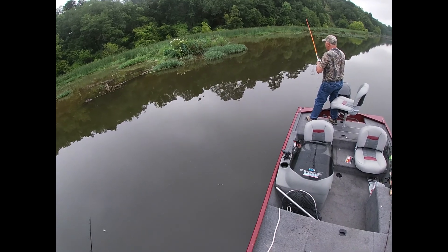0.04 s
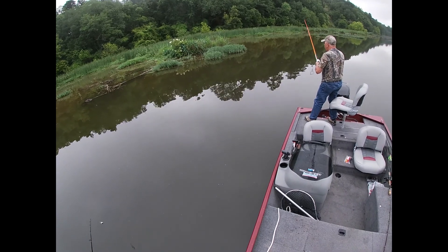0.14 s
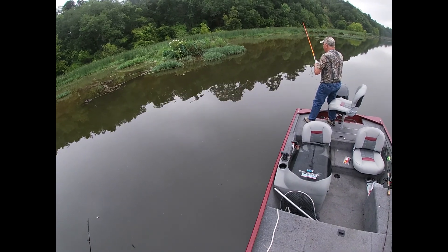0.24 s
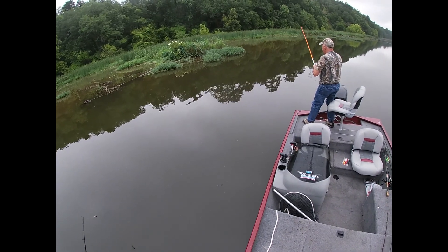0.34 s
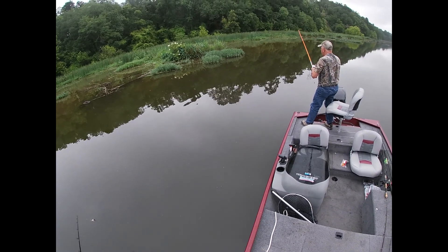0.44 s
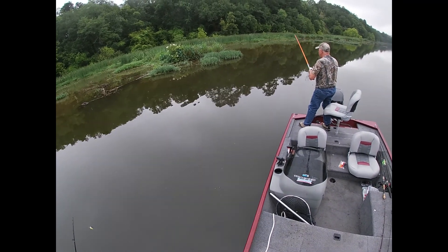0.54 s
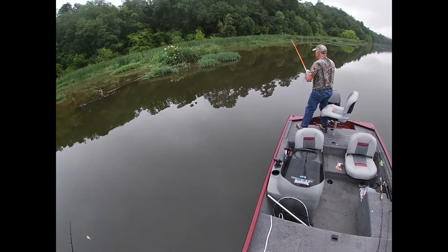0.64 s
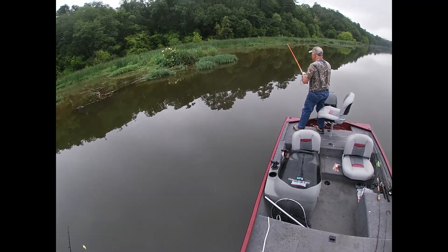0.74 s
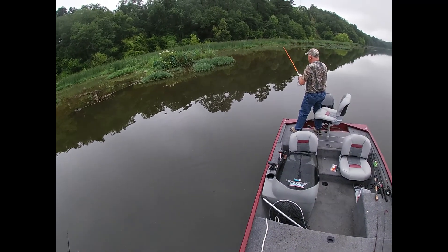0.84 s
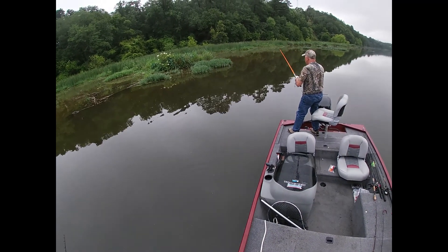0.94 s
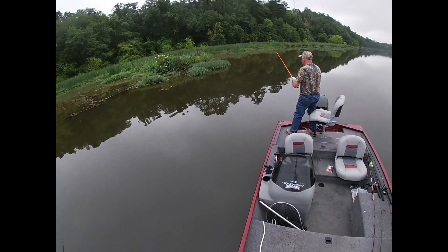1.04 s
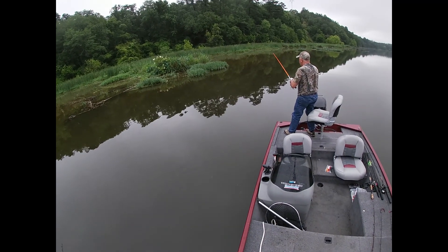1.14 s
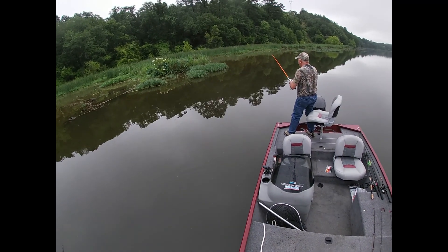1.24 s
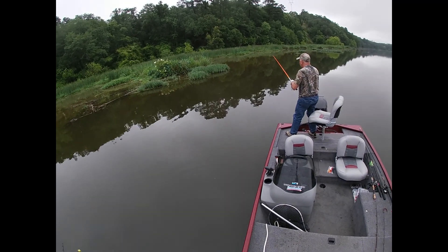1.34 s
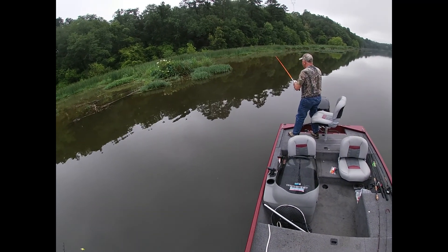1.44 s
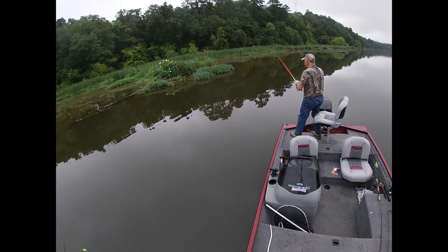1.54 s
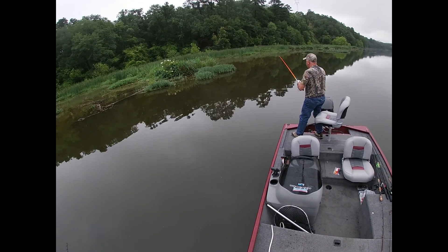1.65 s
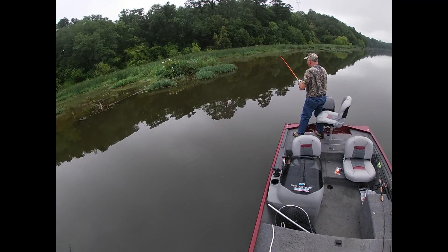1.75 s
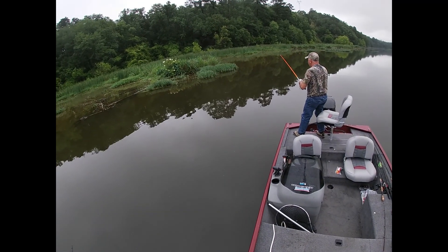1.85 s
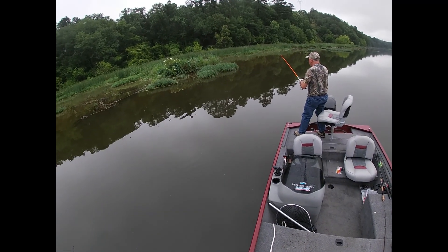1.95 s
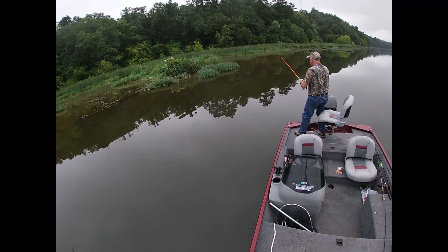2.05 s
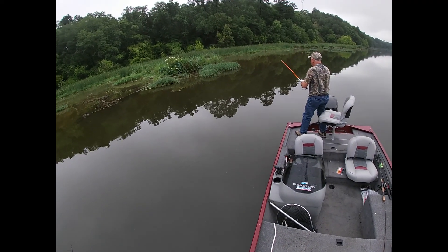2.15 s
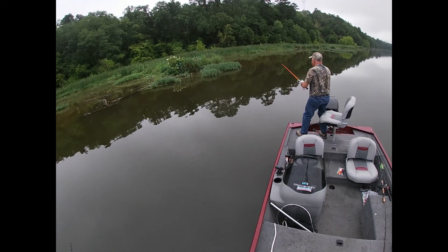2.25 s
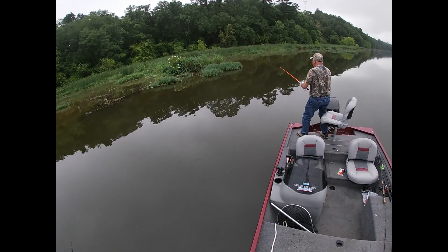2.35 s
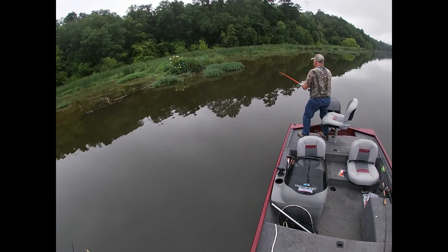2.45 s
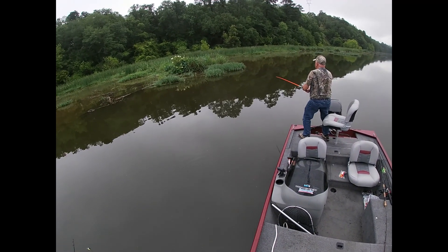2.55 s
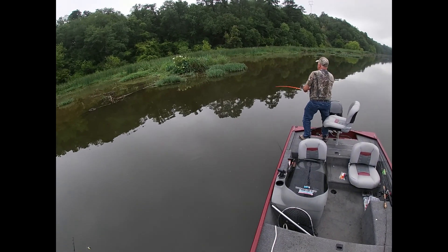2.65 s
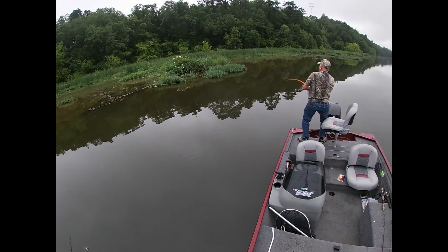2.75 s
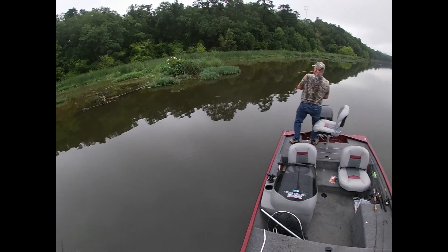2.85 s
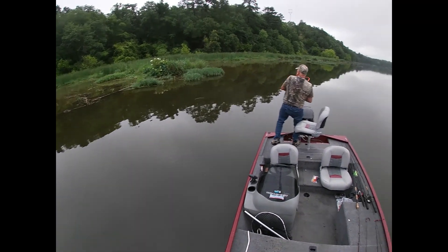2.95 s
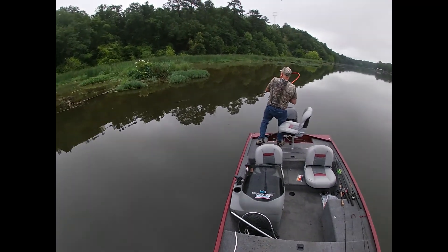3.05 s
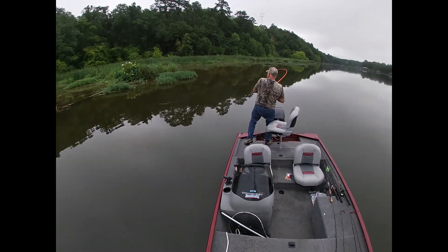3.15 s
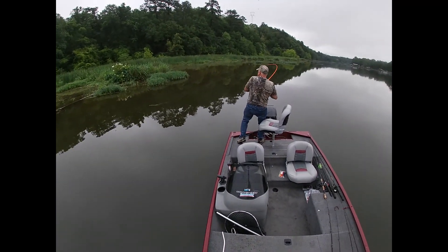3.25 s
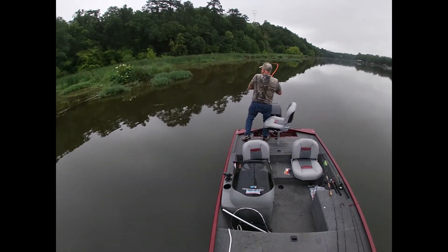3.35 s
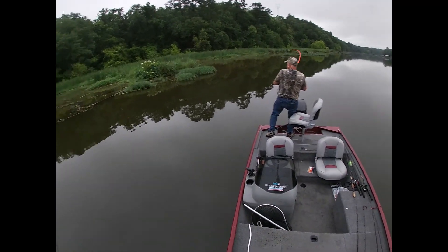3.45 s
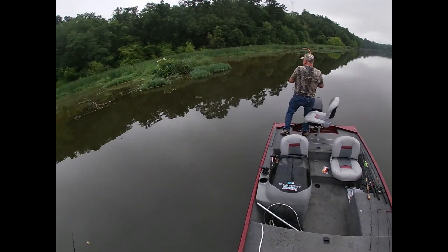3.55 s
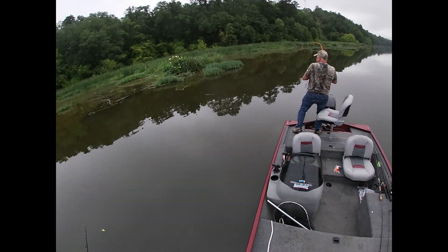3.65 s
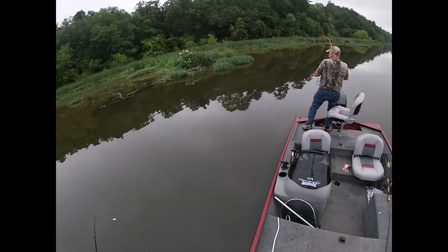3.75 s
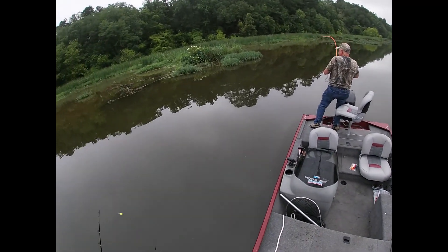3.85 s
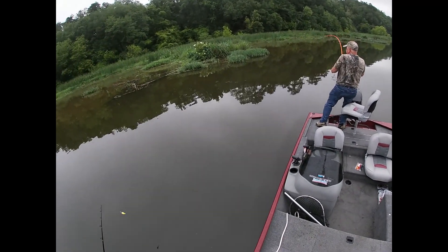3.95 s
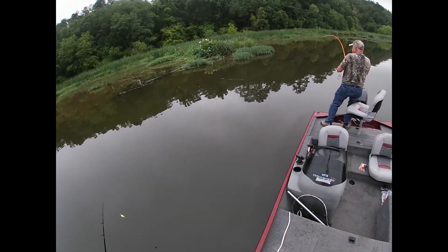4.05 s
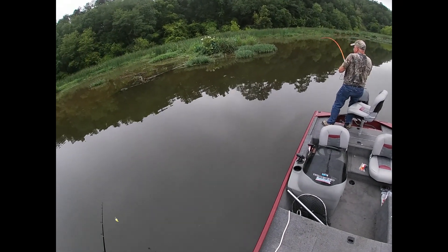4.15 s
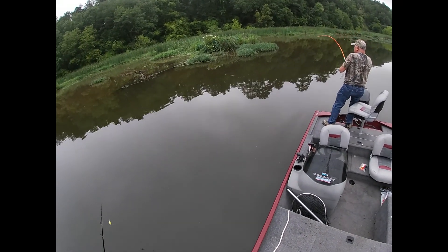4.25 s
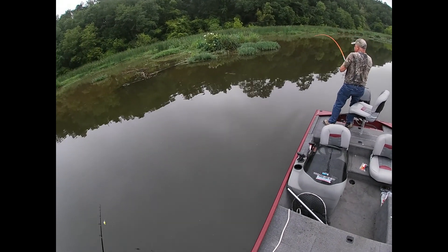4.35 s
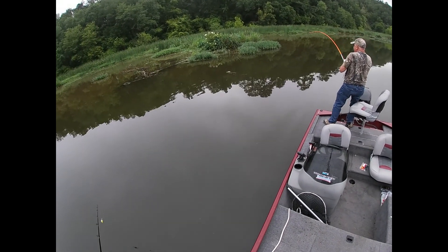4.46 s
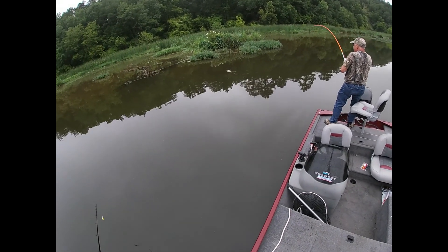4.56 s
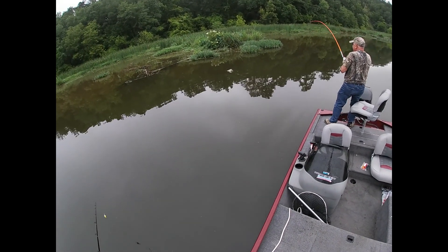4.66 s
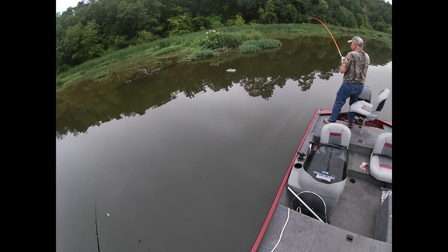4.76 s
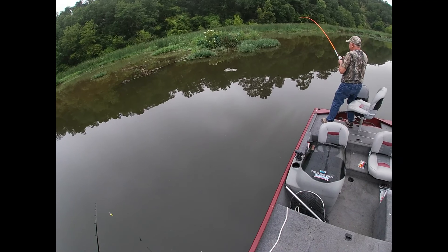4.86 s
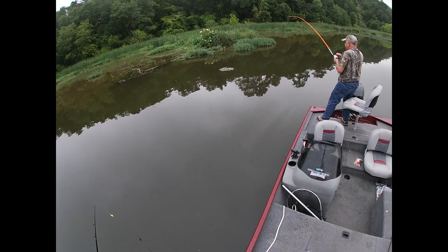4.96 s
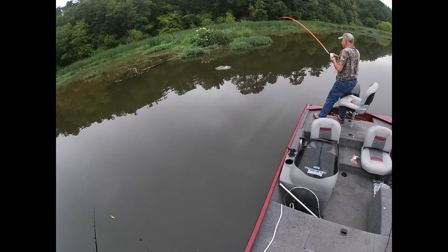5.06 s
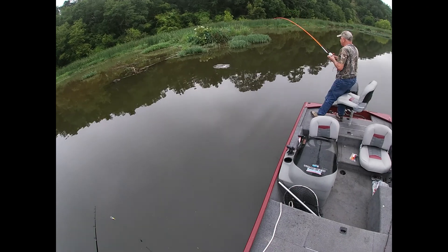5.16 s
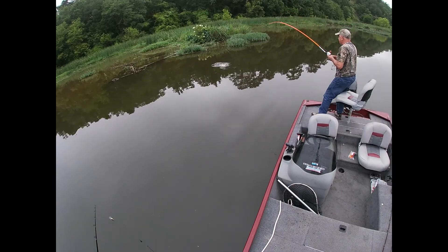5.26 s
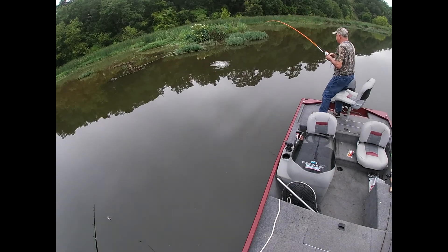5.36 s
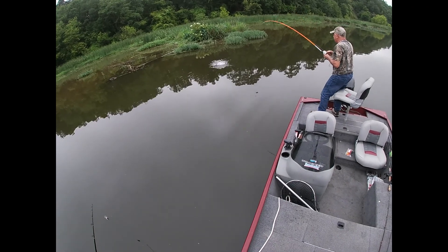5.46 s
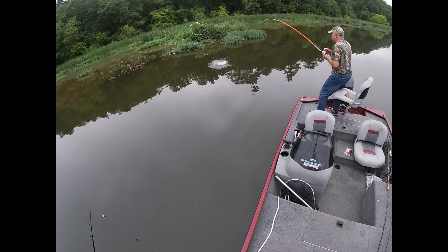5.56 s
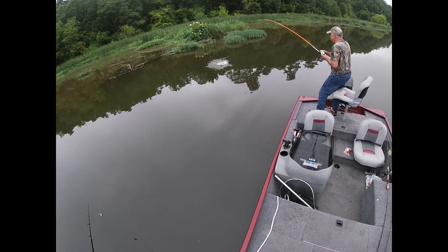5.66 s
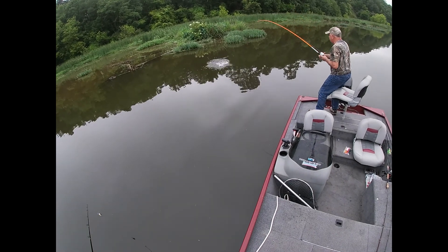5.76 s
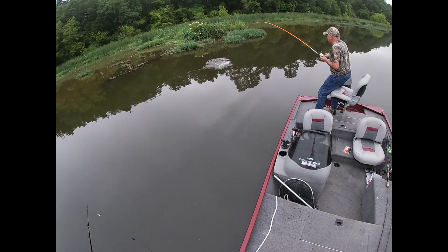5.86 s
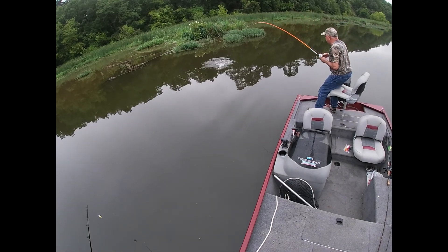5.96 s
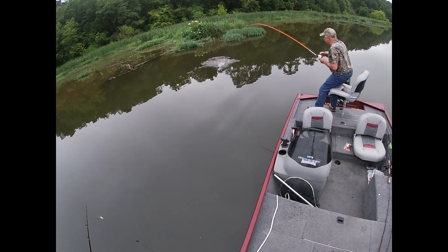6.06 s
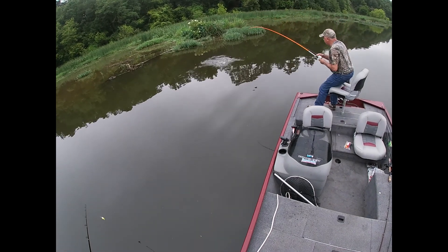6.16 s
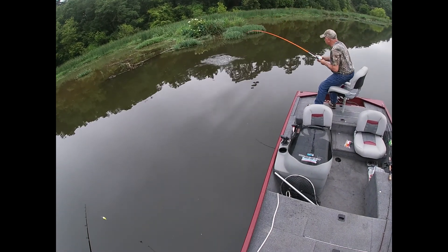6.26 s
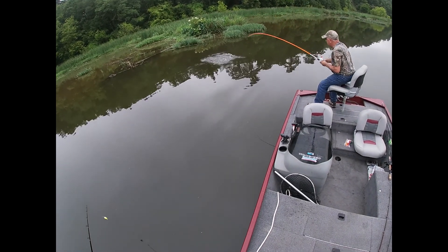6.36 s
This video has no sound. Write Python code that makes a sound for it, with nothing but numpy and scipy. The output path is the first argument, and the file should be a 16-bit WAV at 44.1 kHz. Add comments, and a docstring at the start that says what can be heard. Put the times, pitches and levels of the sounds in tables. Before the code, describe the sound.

Quiet lakeside with steady insect buzz and birdsong, a faint reel whirr, sharp hollow boat knocks, then a hooked fish slapping and churning the water.

```python
"""A calm lake under a wooded bank: insects buzz as pulsed narrow-band noise and songbirds whistle gliding tones.
An electric motor throbs as a faint low hum under still air, a faint drone and wind, and a reel whirrs in spells.
One bird then repeats a three-note motif, and the boat's deck knocks twice as the hook is set, its modes ringing.
Last, the hooked bass thrashes a few boat lengths away: churned water rings as swarms of damped bubble tones,
the body slaps in noise bursts, trapped air pockets gulp in rising tones, and spray patters back."""
import sys
import numpy as np
from scipy import signal
from scipy.fft import rfft, irfft, next_fast_len
from scipy.io import wavfile
from scipy.ndimage import map_coordinates

SR = 44100
rng = np.random.default_rng(int(sys.argv[2]) if len(sys.argv) > 2 else 0)


def store_pcm(level_fs):
    """Save levels as 16-bit WAV."""
    pcm = np.round(np.clip(level_fs, -1, 1) * 32767).astype(np.int16)
    wavfile.write(sys.argv[1], SR, np.atleast_2d(pcm).T)


N = 283122  # length in samples


def amp(db):
    """Level: every 20 dB is a tenfold amplitude."""
    return 10 ** (np.asarray(db) / 20)


def unit(x):
    """Normalisation: scale to rms 1."""
    return x / np.sqrt(np.mean(x ** 2) + 1e-20)


def clock(length):
    """Sampling: the sample times over a length in seconds."""
    return np.arange(int(length * SR)) / SR


def wobble(rate):
    """Slow random modulation: a smooth curve through normal random knots, rate knots a second."""
    knots = rng.standard_normal(int(N * rate / SR) + 4)
    return map_coordinates(knots, [np.arange(N) * rate / SR])


def filtered(x, response):
    """Linear filtering: multiply the spectrum by a response of frequency in Hz."""
    size = next_fast_len(len(x) + 8192)  # zero padding
    return irfft(rfft(x, size) * response(np.fft.rfftfreq(size, 1 / SR)), size)[:len(x)]


def coloured(x, points):
    """Spectral shaping: filter x through (Hz, dB) points joined on a log frequency axis, at rms 1."""
    f, db = np.transpose(points)
    return unit(filtered(x, lambda hz: amp(np.interp(np.log(hz + 1), np.log(f), db))))


def noise(points):
    """Coloured noise: white noise shaped by (Hz, dB) points, at rms 1."""
    return coloured(rng.standard_normal(N), points)


def resonance(hz, width):
    """Narrow-band resonance: noise of rms 1 under one peak, width in Hz."""
    return unit(filtered(rng.standard_normal(N), lambda f: 1 / (1 + (2 * (f - hz) / width) ** 2)))


def tone(pitch):
    """Frequency modulation: the phase is the running sum of the pitch in Hz."""
    return np.sin(2 * np.pi * np.cumsum(pitch) / SR)


def fade(t, t60, attack):
    """Damped decay: a quick rise, then an exponential loss of 60 dB per t60 seconds."""
    return np.exp(-np.log(1000) * t / t60) * (1 - np.exp(-t / attack))


def swells(rows, attack_s, fall_db_per_s, rest_db):
    """Power summation: (start s, length s, dB) rows rise, hold and fall away over a resting level."""
    t = np.arange(N) / SR
    power = amp(rest_db) ** 2
    for start, length, db in rows:
        rise = 1 - np.exp(-np.maximum(t - start, 0) / attack_s)
        fall_db = fall_db_per_s * np.maximum(t - start - length, 0)
        power = power + (rise * amp(db - fall_db)) ** 2
    return np.sqrt(power)


def add(track, start, sound):
    """Superposition: mix a sound into a track at a start in seconds."""
    part = track[max(round(start * SR), 0):][:len(sound)]
    part += sound[:len(part)]


def bubbles(rate, low_hz, high_hz, cycles, rise, spread_db):
    """Bubble resonance: a steady swarm, rate a second, of softly starting, damped tones that rise in pitch."""
    pitch_draw, decay_draw, level_draw, time_draw = rng.random((4, int(rate * N / SR), 1))
    hz = low_hz * (high_hz / low_hz) ** pitch_draw
    t = clock(min(.045, cycles / low_hz))[None]
    age = t * hz / (cycles * (.5 + decay_draw))  # 1 once the tone has lost 60 dB
    size = amp(spread_db * np.minimum(-np.log(1 - level_draw), 3)) * np.sqrt(hz)
    envelope = size * np.minimum(2 * t * hz, 1) * np.exp(-np.log(1000) * age)
    # the pitch has gained the share "rise" at age 1
    tones = envelope * np.sin(2 * np.pi * hz * t * (1 + rise * np.minimum(age, 2) / 2))
    at = (time_draw * N).astype(int) + np.arange(t.size)
    return np.bincount(at.ravel(), tones.ravel(), N)[:N]


def thrash():
    """Bubble resonance: churned water rings, gurgles and plops while spray patters and ticks over a fizz."""
    # Bouts of thrashing. Each row: start in seconds, length in seconds, churn, spray and gurgle levels in dB.
    bouts = [(4.735, 0.079, -58, -60, -85), (4.867, 0.092, -57.5, -54.5, -77),
             (5.08, 0.24, -57.5, -58.5, -71), (5.28, 0.23, -53.5, -55, -58), (5.5, 0.32, -50.5, -52, -61),
             (5.776, 0.29, -51, -54, -62), (6.075, 0.037, -68, -66, -52.5)]
    # Spectra of churned water and of spray. Each row: frequency in Hz, relative level in dB.
    churn_spectrum = [(100, -39), (170, 12.5), (260, -11), (450, -9.5), (770, -1.5), (1060, -7), (1500, 3),
                      (2000, -7), (2300, -4.5), (3200, -12), (5000, -12), (8000, -68)]
    spray_spectrum = [(900, -30), (1800, -3.5), (3100, 3.5), (4300, -2), (6200, -0.5), (7500, -8.5),
                      (8700, -20.5), (10000, -20.5), (12500, -37), (15500, -55)]
    starts, lengths, churn_db, spray_db, gurgle_db = np.transpose(bouts)
    churn_gain = swells(zip(starts, lengths, churn_db), attack_s=0.02, fall_db_per_s=44.0, rest_db=-110)
    spray_gain = swells(zip(starts, lengths, spray_db), attack_s=0.015, fall_db_per_s=34.0, rest_db=-110)
    gurgle_gain = swells(zip(starts, lengths, gurgle_db), attack_s=0.022, fall_db_per_s=94, rest_db=-110)

    churn = bubbles(rate=380, low_hz=497.6, high_hz=3500, cycles=37.0, rise=0.34, spread_db=1.5)
    plops = bubbles(rate=60, low_hz=696, high_hz=2017, cycles=49, rise=0.18, spread_db=2.0)
    gurgle = bubbles(rate=160, low_hz=177, high_hz=526, cycles=11.4, rise=0.49, spread_db=2.5)
    drops = bubbles(rate=1100, low_hz=1810, high_hz=12700, cycles=26.4, rise=0.16, spread_db=2)
    # single drops landing
    ticks = unit(bubbles(rate=77, low_hz=2180, high_hz=6540, cycles=4.9, rise=.1, spread_db=-3.0))
    ticks = filtered(ticks, lambda hz: 1 / np.hypot(1, (hz / 7000) ** 4))

    water = coloured(churn, churn_spectrum) + amp(-6.0) * unit(plops)
    spray = coloured(drops, spray_spectrum) + amp(-12) * ticks
    fizz = amp(-13) * (churn_gain * noise(churn_spectrum) + spray_gain * noise(spray_spectrum))
    clumps = amp(1.6 * wobble(45))  # water falls back in sheets
    return clumps * (churn_gain * water + gurgle_gain * unit(gurgle) + spray_gain * spray + fizz)


def slaps():
    """Impact radiation: each blow gives a pressure pulse and a noise burst; flatter landings are brighter."""
    # Blows of tail and body on the water. Each row: start in seconds, level in dB, upper band limit in Hz.
    blows = [(4.876, -50.5, 1800), (5.010, -50.5, 2600), (5.079, -42.5, 1544), (5.091, -44.5, 2050),
             (5.168, -44.5, 2000), (5.327, -49, 4280), (5.379, -42.5, 1390), (5.395, -38, 1100),
             (5.466, -43, 1100), (5.512, -37.5, 3240), (5.525, -38.5, 3420), (5.687, -44, 3500),
             (5.806, -41.5, 3430), (6.044, -46.5, 1274), (6.060, -41, 3500), (6.090, -42, 2970),
             (6.110, -41.5, 1250), (6.127, -46, 3820), (6.334, -47, 1800)]
    out, t = np.zeros(N), clock(0.22)

    def spectrum(hz, top_hz):
        """Band-pass: a low cut, a slight tilt and a steep roll-off above top_hz."""
        tilt = 1 / np.hypot(1, hz / 1100) ** 0.075
        return hz / np.hypot(hz, 280) * tilt / np.hypot(1, (hz / top_hz) ** 4)

    for start, db, top_hz in blows:
        burst = unit(filtered(rng.standard_normal(len(t)), lambda hz: spectrum(hz, top_hz)))
        burst = burst * fade(t, t60=137 / top_hz, attack=0.00033)  # dull blows last longer
        push = np.sin(np.pi * top_hz * t) * fade(t, t60=7 / top_hz, attack=.0001)
        add(out, start, amp(db) * (burst + amp(-13.0) * push))
    return filtered(out, lambda hz: 1 / np.hypot(1, (hz / 7000) ** 4))


def pockets():
    """Bubble resonance: trapped air rings, rising in pitch as it nears the surface; big pockets climb more."""
    # Singly ringing air pockets. Each row: start in seconds, starting pitch in Hz, level in dB, t60 in seconds.
    air_pockets = [(4.751, 692, -46, 0.071), (4.790, 1250, -44.5, 0.052), (4.840, 1700, -36, 0.04),
                   (4.884, 420, -47.5, 0.16), (4.976, 191, -40, 0.093), (5.035, 840, -42, 0.033),
                   (5.079, 333, -28.5, 0.019), (5.093, 200, -49, 0.13), (5.168, 784, -30.5, 0.03),
                   (5.195, 820, -33.5, 0.044), (5.303, 1256, -40, 0.037), (5.394, 870, -32, .025),
                   (5.421, 305, -44, 0.23), (5.467, 388, -37, 0.1), (5.487, 240, -36, 0.051),
                   (5.511, 564, -19, 0.01), (5.516, 279, -34, 0.18), (5.591, 1400, -40, 0.03),
                   (5.612, 677, -37, 0.038), (5.665, 691, -42, 0.091), (5.692, 1554, -45, 0.044),
                   (5.945, 745, -37, .07), (5.956, 2360, -39, 0.023), (6.01, 1360, -36.5, 0.032),
                   (6.032, 184, -31.5, 0.15), (6.046, 275, -31, 0.071), (6.090, 2310, -37, 0.035),
                   (6.100, 216, -34.5, 0.078), (6.103, 813, -34, 0.031), (6.115, 326, -38.5, 0.12),
                   (6.190, 700, -35, 0.024), (6.235, 430, -39, 0.083), (6.331, 196, -37.5, 0.1),
                   (6.334, 595, -31, 0.019), (6.355, 670, -38, 0.05)]
    octave_rise_hz = 237  # a pocket of this pitch climbs an octave within its t60
    swell_cycles = 0.93  # big pockets start more softly than small ones
    out, t = np.zeros(N), clock(.25)
    for start, hz, db, t60 in air_pockets:
        octaves = octave_rise_hz / hz * np.minimum(t / t60, 1)
        add(out, start, amp(db) * tone(hz * 2 ** octaves) * fade(t, t60, attack=swell_cycles / hz))
    return out


def scattered(x):
    """Diffuse scattering: ripples and the near bank return a sound as a short wash."""
    t = clock(.25)
    tail = rng.standard_normal(len(t)) * fade(t, t60=0.23, attack=0.0097)
    return x + amp(-11.5) * signal.fftconvolve(x, tail / np.linalg.norm(tail))[:N]


def knocks():
    """Modal vibration: a hard double contact cracks, the struck part rings, the hollow deck booms and rattles."""
    # Knocks on the boat. Each row: start in seconds, crack level in dB, deck level in dB,
    # ring of the struck part in Hz, ring level in dB.
    contacts = [(2.801, -38.5, -48.5, 1790, -39.5), (2.999, -55, -51, 470, -46.5),
                (3.0188, -33, -43, 2140, -37.5)]
    # Spectrum of the crack. Each row: frequency in Hz, relative level in dB.
    crack_spectrum = [(300, -14), (1000, -8.5), (1900, -2), (3800, 0), (5500, 5), (7500, -10), (10000, -22),
                      (15000, -45)]
    # Modes of the deck. Each row: frequency in Hz, mean relative level in dB, t60 in seconds.
    deck_modes = [(167.3, 0, 0.49), (198, 1, 0.37), (240, -3.5, 0.21), (381, -3, 0.17), (409, -4, 0.16),
                  (504, -2.5, 0.18), (638, 1, 0.078), (734, -3.5, .13), (940, -7, 0.064), (1310, -5, 0.1),
                  (1526, -2, 0.08)]
    rattle_spectrum = [(100, 6.5), (350, 5.5), (1400, -1), (3500, -1.5), (7000, -9), (14000, -63)]  # Hz, dB
    out, t = np.zeros(N), clock(0.44)
    for start, crack_db, deck_db, ring_hz, ring_db in contacts:
        for delay, db in [(0, 1.9), (.003, 0.21)]:  # seconds, dB
            crack = noise(crack_spectrum)[:len(t)] * fade(t, t60=0.023, attack=0.000087)
            add(out, start + delay, amp(crack_db + db) * crack)
        ring = np.sin(2 * np.pi * ring_hz * t) * fade(t, t60=0.037, attack=0.00046)
        add(out, start, amp(ring_db) * ring)
        boom = np.zeros(len(t))
        for hz, db, t60 in deck_modes:
            mode = np.sin(2 * np.pi * (hz * t + rng.random())) * fade(t, t60, attack=0.0011)
            boom += amp(db + rng.normal(0, 2.1)) * mode  # every knock excites the modes unevenly
        rattle = (noise(rattle_spectrum) * amp(3.3 * wobble(152)))[:len(t)]
        rattle = rattle * fade(t, t60=0.24, attack=0.0028)
        add(out, start, amp(deck_db) * (amp(-6.5) * boom + amp(-2.0) * rattle))
    return out


def hump(u):
    """Amplitude envelope: a note swells and fades over its relative time u, 0 to 1."""
    return np.sqrt(np.abs(np.sin(np.pi * u)))


def whistle(length, start_hz, final_hz, sag=0):
    """Frequency glide: a slightly quavering note; a positive sag bends its pitch below the straight line."""
    u = clock(length) / length
    pitch = (start_hz + (final_hz - start_hz) * u) * (1 - sag * np.sin(np.pi * u))
    quaver = 1 + 0.0035 * np.sin(2 * np.pi * (2 * u + rng.random()))
    return tone(pitch * quaver) * hump(u)


def arch(length, top_hz):
    """Frequency glide: a note hooks up to its pitch, holds it unsteadily and drops off at the end."""
    u = clock(length) / length
    hook = (np.abs(u - .45) / .55) ** 4
    drop = 0.142  # share of the pitch lost at the end
    return tone(top_hz * (1 - drop * hook + 0.002 * wobble(90)[:len(u)])) * hump(u)


def thin_call(length, hz):
    """Random frequency modulation: a very high, sinking note flutters fast and unevenly."""
    u = clock(length) / length
    fall, flutter = 0.031, 0.022  # shares of the pitch
    return tone(hz * (1 - fall * u + flutter * wobble(220)[:len(u)])) * hump(u)


def far_birds():
    """Superposition: farther birds twitter in many hooked notes, up and down at random."""
    # The spell of twittering. Each row: start in seconds, length in seconds, level in dB.
    twitter = [(2.2, 1.63, -71.5)]
    far = np.zeros(N)
    for when, start, final, bend in rng.random(size=(150, 4)):
        note = whistle(.045, 2700 + 1900 * start, 2700 + 1900 * final, sag=.25 * (bend - .5))
        add(far, when * N / SR, note)
    return swells(twitter, attack_s=0.12, fall_db_per_s=8, rest_db=-84) * unit(far)


def birds():
    """Reverberation: songbirds on the bank, one repeating its motif, are smeared by echoes among the trunks."""
    # Falling slurs. Each row: start in seconds, starting pitch in Hz, level in dB.
    slurs = [(.03, 3230, -59.5), (.315, 3400, -60.5), (2.082, 4344, -61.5), (2.129, 5200, -62),
             (2.36, 4600, -61), (2.72, 4870, -59.5), (3.895, 4600, -62), (4.336, 4270, -55),
             (4.437, 3980, -63)]
    # Sliding whistles and upward flicks. Each row: start and length in seconds, starting and final pitch in Hz,
    # level in dB.
    slides = [(0.159, 0.15, 2750, 2470, -71), (1.008, 0.19, 2830, 2580, -65),
              (1.901, 0.19, 2890, 2650, -65), (2.1, 0.24, 2624, 2395, -71.5),
              (2.239, .036, 4400, 4860, -56.5), (2.337, .03, 3480, 4550, -56),
              (4.285, 0.021, 3060, 4420, -56)]
    # Arched whistles. Each row: start and length in seconds, top pitch in Hz, level in dB.
    arches = [(0.613, .085, 3780, -67.5), (0.782, 0.13, 3370, -64), (.985, 0.076, 3810, -66),
              (1.151, 0.11, 3320, -60.5), (1.371, 0.062, 3785, -69), (1.53, 0.075, 3300, -64)]
    # Very high, fluttering calls. Each row: start and length in seconds, starting pitch in Hz, level in dB.
    thin_calls = [(0.133, .05, 7300, -75), (3.97, 0.16, 7650, -73), (4.05, 0.23, 7000, -72),
                  (4.33, 0.12, 6700, -65.5), (4.747, 0.088, 6720, -62), (4.78, 0.13, 8100, -70)]
    # Three-note motif. Each row: delay into the motif and length in seconds, starting and final pitch in Hz,
    # sag as a share of the pitch, level in dB.
    motif = [(0, .059, 4256, 2765, 0.06, -59.5), (0.073, 0.055, 3080, 3570, -0.056, -74),
             (0.169, 0.026, 2068, 2010, 0, -60)]
    song = np.zeros(N)
    for start, start_hz, db in slurs:
        add(song, start, amp(db) * whistle(0.046, start_hz, .72 * start_hz, sag=0.0476))
    for start, length, start_hz, final_hz, db in slides:
        add(song, start, amp(db) * whistle(length, start_hz, final_hz))
    for start, length, top_hz, db in arches:
        add(song, start, amp(db) * arch(length, top_hz))
    for start, length, hz, db in thin_calls:
        add(song, start, amp(db) * thin_call(length, hz))
    for start in 2.607 + .304 * np.arange(6):  # six evenly spaced motifs, in seconds
        for delay, length, start_hz, final_hz, sag, db in motif:
            add(song, start + delay, amp(db) * whistle(length, start_hz, final_hz, sag))
    song = song * amp(2.3 * wobble(70)) + far_birds()
    t = clock(.6)
    woods = rng.standard_normal(len(t)) * fade(t, t60=0.56, attack=0.0015)
    echoes = signal.fftconvolve(song, woods / np.linalg.norm(woods))[:N]
    return amp(-0.5) * song + amp(-4.0) * echoes


def insects():
    """Amplitude modulation: a chorus blurs into a narrow buzz, with the nearest singer's pulses in it."""
    # Spectrum of the chorus. Each row: frequency in Hz, relative level in dB.
    chorus_spectrum = [(3500, -32), (4600, -20), (4950, -6.5), (5250, 3), (5650, -5), (6050, -4.5),
                       (6400, -11.5), (6900, -31.5), (8000, -43.5), (14000, -77)]
    pulses = tone(70 + 0.7 * wobble(2.8))  # pulses a second
    return amp(-55.0 + 0.63 * pulses + 0.52 * wobble(8.4)) * noise(chorus_spectrum)


def reel():
    """Broadband friction noise: the reel whirrs softly in spells of winding line."""
    # Spells of winding. Each row: start in seconds, length in seconds, level in dB.
    winding = [(.64, 0.61, -65.5), (1.8, 0.083, -67.5), (2.62, 0.21, -64), (2.94, 0.11, -58),
               (3.1, 0.44, -69.5)]
    # Spectrum of the whirr. Each row: frequency in Hz, relative level in dB.
    whirr_spectrum = [(300, -0.5), (800, 2.5), (1100, -0.5), (1500, 8), (2000, -5.5), (2800, 3),
                      (4500, -18), (7500, -12.5), (11000, -34), (15000, -61)]
    gain = swells(winding, attack_s=0.031, fall_db_per_s=110, rest_db=-79.5)
    return gain * noise(whirr_spectrum)


def motor():
    """Amplitude modulation: the electric motor's unsteady low hum throbs at a drifting rate."""
    # Course of the hum. Each row: time in seconds, throbs a second, level in dB about which it throbs.
    motor_course = [(0, 5, -73.5), (1.1, 6.5, -78.5), (2.2, 4.43, -73.5), (3.4, 2.94, -71.5),
                    (3.9, 2.8, -64.5), (4.5, 2.67, -80), (4.95, 1.8, -64.5), (5.3, 2.9, -78),
                    (5.8, 3.6, -71.5)]
    t = np.arange(N) / SR
    times, throb_rate, db = np.transpose(motor_course)
    throbs = np.cumsum(np.interp(t, times, throb_rate)) / SR
    throb = np.cos(2 * np.pi * (throbs - np.interp(0.231, t, throbs)))  # a crest at 0.231 s
    return amp(np.interp(t, times, db) + 7 * throb) * tone(77.6 + 3 * wobble(12))


def wind():
    """Turbulence: light wind rumbles as low-frequency noise and swells in short puffs."""
    # Puffs of wind. Each row: start in seconds, length in seconds, level in dB.
    puffs = [(3.42, 0.096, -59.5), (6.19, 0.051, -56)]
    rumble = noise([(8, -7.5), (25, -10.5), (60, -7.5), (130, -25.0), (500, -74)])  # Hz, dB
    gain = swells(puffs, attack_s=0.012, fall_db_per_s=172, rest_db=-77.0)
    return gain * amp(2.1 * wobble(5.3)) * rumble


def drone():
    """Narrow-band resonance: faint bands of the surroundings waver independently."""
    # Bands of the drone. Each row: centre in Hz, width in Hz, level in dB.
    bands = [(155.4, 25, -71), (195.8, 35, -72), (796, 170, -76), (2290, 170, -74.5)]
    return sum(amp(db + 1.86 * wobble(3.98)) * resonance(hz, width) for hz, width, db in bands)


def air():
    """Broadband ambience: still air is steady coloured noise with a slight waver."""
    # Spectrum of the air. Each row: frequency in Hz, relative level in dB.
    air_spectrum = [(20, -7.5), (100, 1.5), (180, 1), (300, -1.5), (550, -10), (800, -11), (1100, -13),
                    (1900, -9.5), (2400, -6.5), (4400, -8.5), (7000, -20), (8500, -27), (11000, -32.5),
                    (14000, -44.5)]
    return amp(-67.0 + 0.65 * wobble(3.33)) * noise(air_spectrum)


def scene():
    """Superposition: the fish, the boat and the bank add up in one channel."""
    fish = thrash() + scattered(slaps() + pockets())
    boat = knocks() + reel() + motor()
    bank = birds() + insects() + wind() + drone() + air()
    return (fish + boat + bank)[None]


def record(dry):
    """Band limiting: a sharp low-pass keeps nothing above 15.5 kHz."""
    return filtered(dry[0], lambda hz: hz < 15500)[None]


dry = scene()
out = record(dry)
store_pcm(out)
```